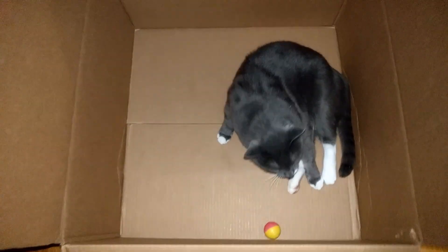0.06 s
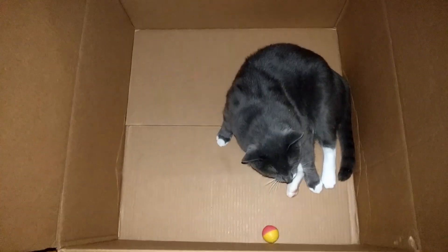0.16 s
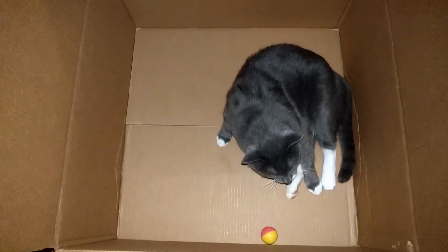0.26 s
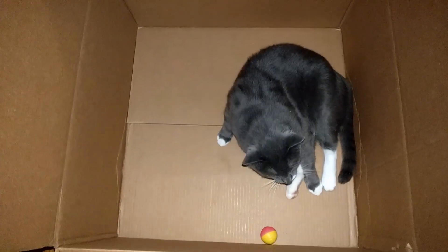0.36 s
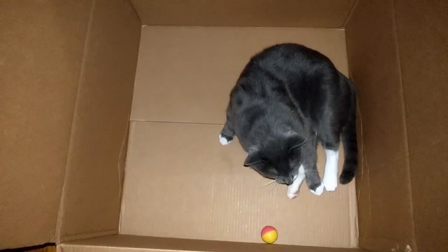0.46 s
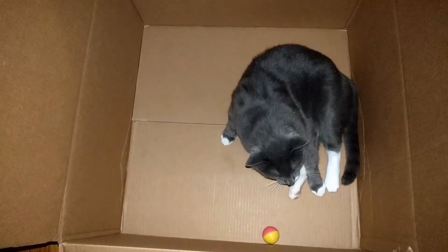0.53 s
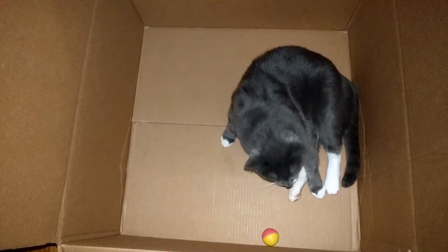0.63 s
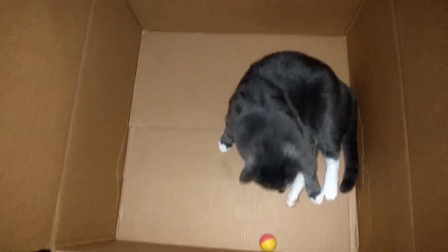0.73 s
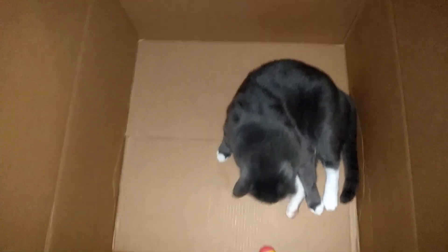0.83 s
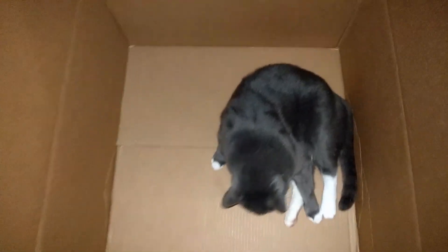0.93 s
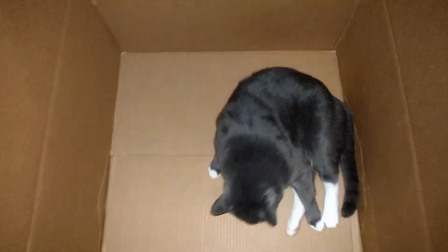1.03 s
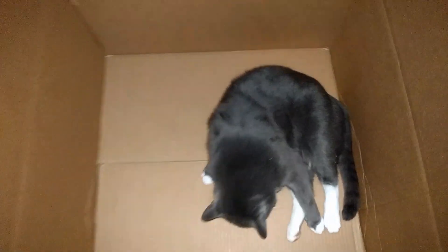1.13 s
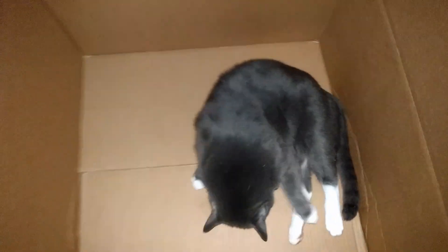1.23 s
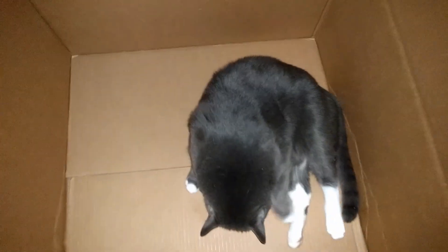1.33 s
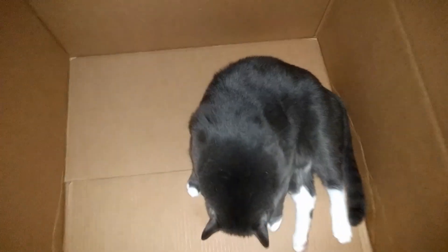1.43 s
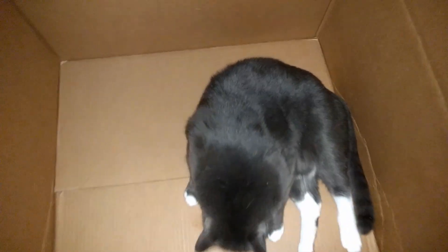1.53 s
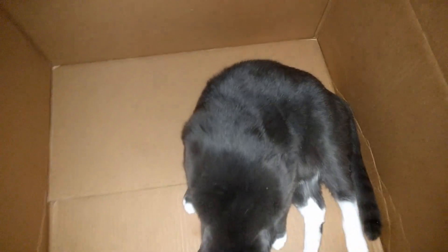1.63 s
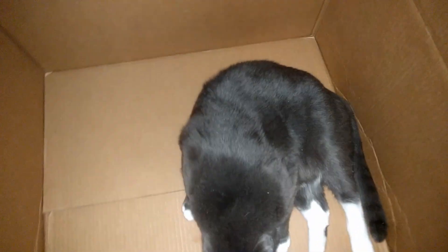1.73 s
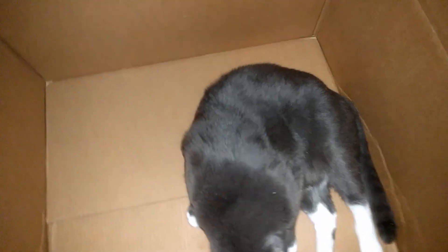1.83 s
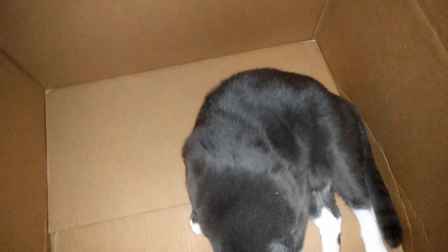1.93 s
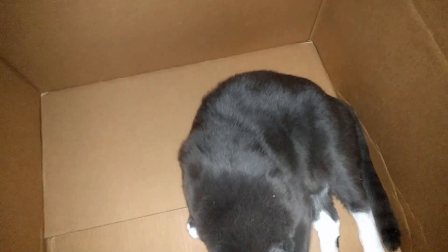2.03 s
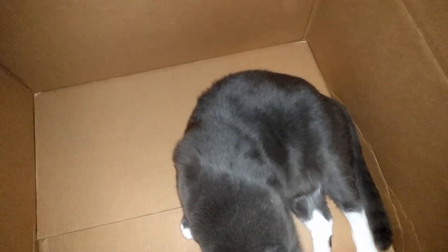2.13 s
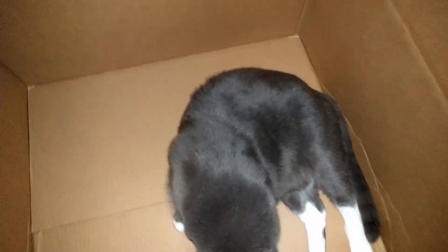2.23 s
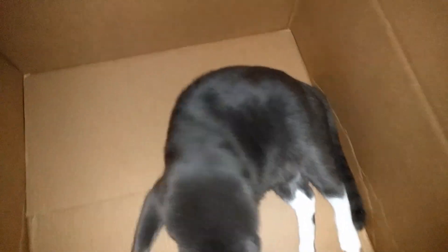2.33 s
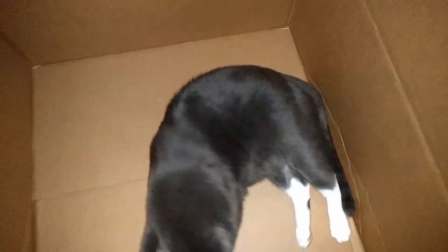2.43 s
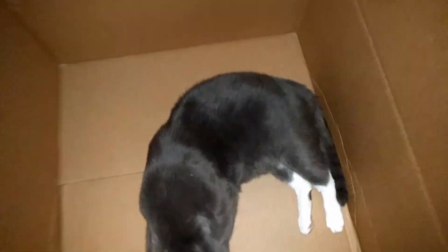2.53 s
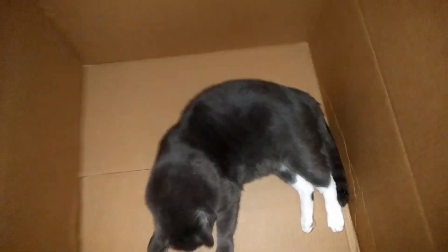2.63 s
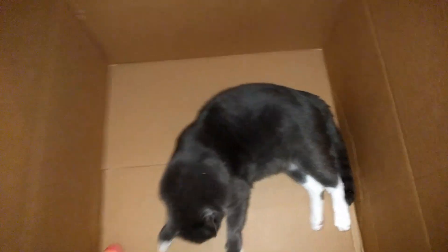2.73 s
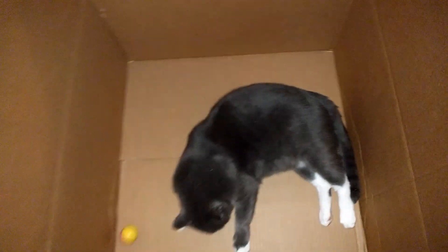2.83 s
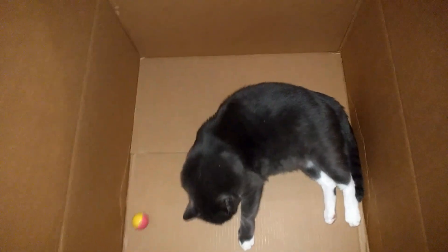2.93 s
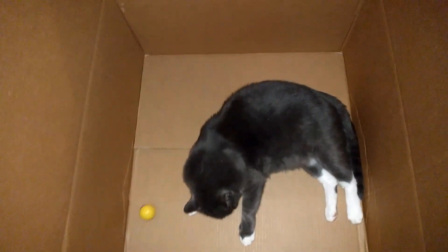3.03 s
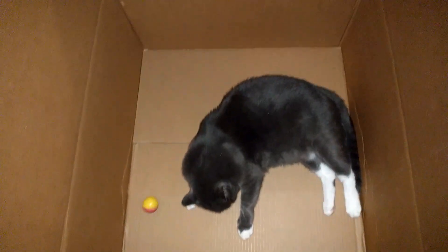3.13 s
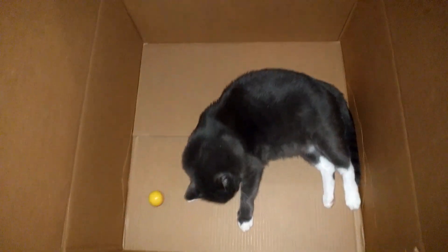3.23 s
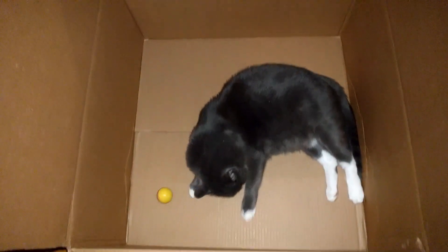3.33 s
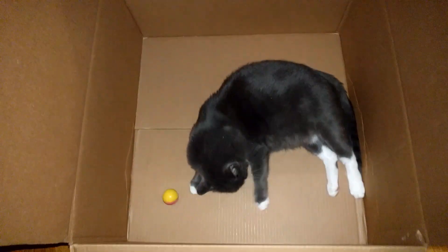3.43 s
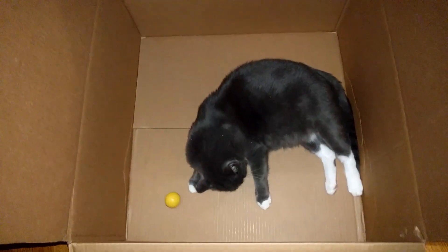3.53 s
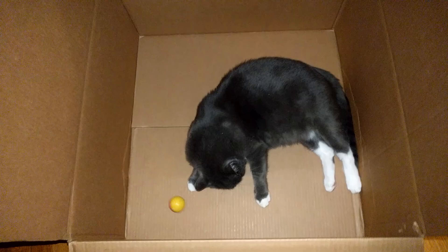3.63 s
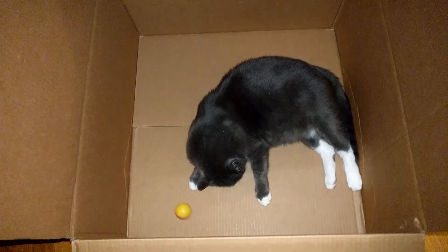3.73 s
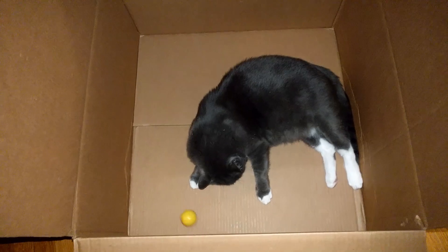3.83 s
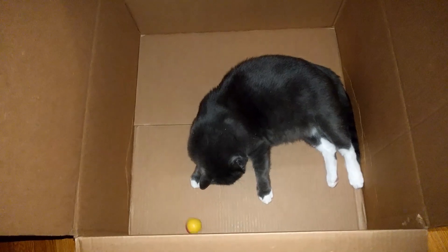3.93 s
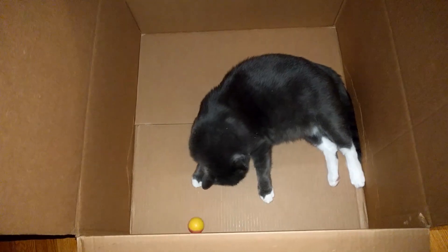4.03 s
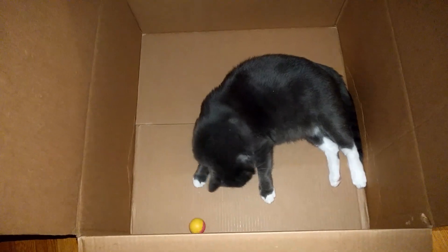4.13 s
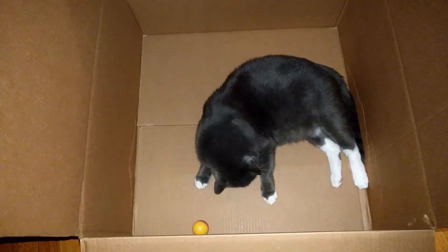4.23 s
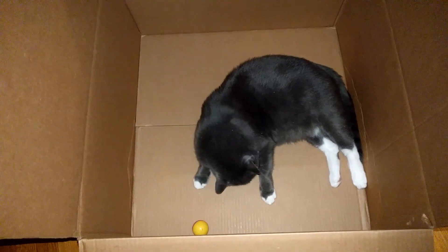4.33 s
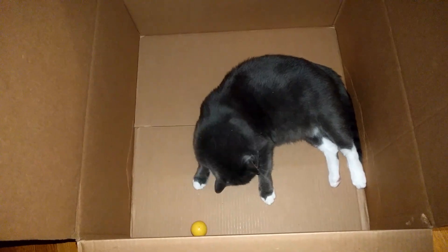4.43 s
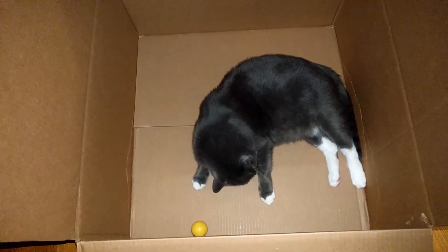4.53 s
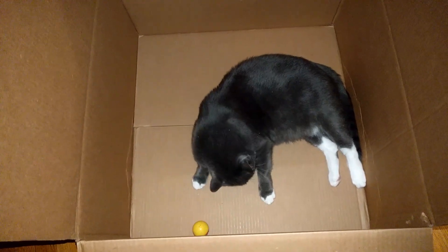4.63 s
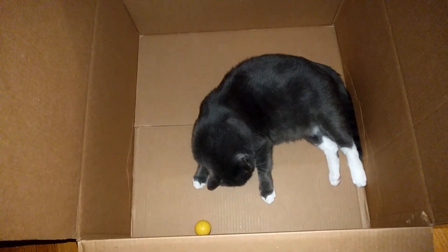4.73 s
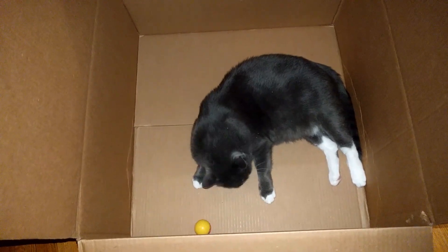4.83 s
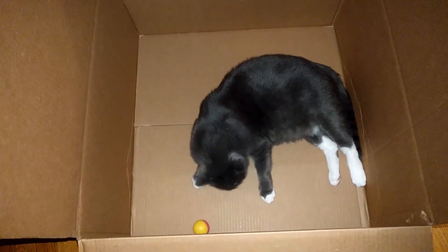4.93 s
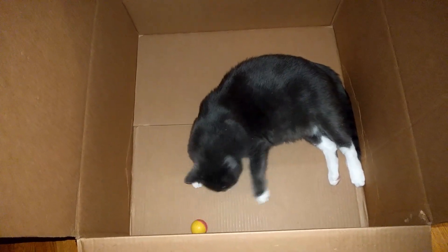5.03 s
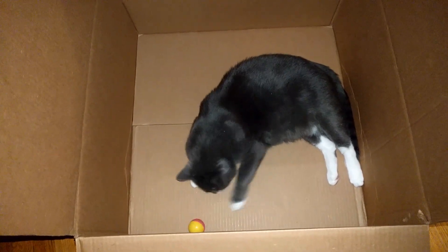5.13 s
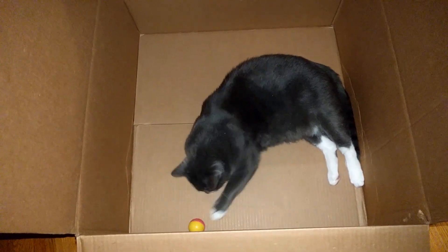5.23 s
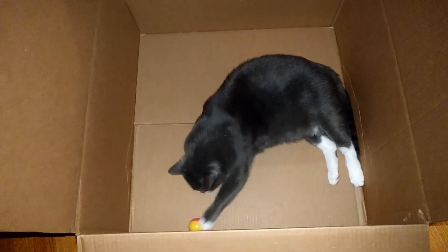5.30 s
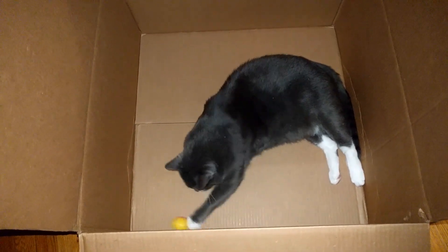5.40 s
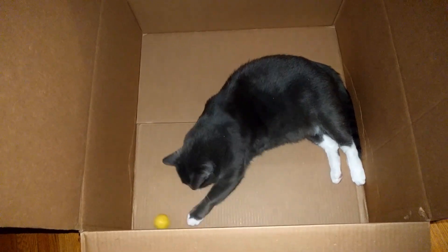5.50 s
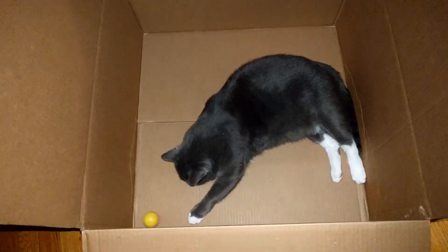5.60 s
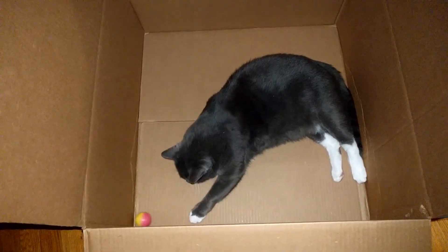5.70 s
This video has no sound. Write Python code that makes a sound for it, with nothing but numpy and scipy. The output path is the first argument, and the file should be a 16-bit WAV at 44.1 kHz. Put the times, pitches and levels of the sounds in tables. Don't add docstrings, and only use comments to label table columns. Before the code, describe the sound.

A cat moves in an open cardboard box in a quiet room, heard close from above on a handheld phone, with slightly bright, sharp treble and faint hum. From 0 to 1 s there are sparse claw ticks, dull board scrapes and low floor rumble, with a sharper catch at about 1.0 s. Soft fur hiss continues until 2.0 s, when the cat turns: strong rasping rustle, a creaking wall from 2.3 s, rapid juddering claws, then the loudest paw slap at 2.6 s and another near 2.7 s, hollow and booming. It settles by 3 s into light rustles, ticks and dull taps from 3.4 to 4.0 s. A light ball knocks the hollow wall clearly at 4.1 s, flaps shivering, with weaker taps at 4.5, 4.7 and 5.1 s. A short crisp scratch and rustle at 5.5-5.7 s fades to near quiet.

```python
import sys
import numpy as np
from scipy import signal
from scipy.fft import rfft, irfft, next_fast_len
from scipy.io import wavfile
from scipy.ndimage import uniform_filter1d

SR = 44100
rng = np.random.default_rng(int(sys.argv[2]) if len(sys.argv) > 2 else 0)


def volts(x):
    e = np.asarray(x, float) / 20
    return 10 ** e


def int16_out(signal):
    q = np.round(np.clip(np.atleast_2d(signal).T, -1, 1) * 32767)
    wavfile.write(sys.argv[1], SR, q.astype(np.int16))


N = 254016

# mode_hz [Hz], level_db [dB], t60_s [s]
LOADED_LOW_MODES = [(192.2, 0, 0.33), (240, -10, 0.2), (201.5, 1.5, 0.13), (306, -2.5, 0.054),
                    (365, -20, 0.15), (443, 3.5, 0.092), (471, -1.5, 0.092), (590, -11.5, 0.13)]


def shape(x, points):
    size = next_fast_len(len(x))
    hz, db = np.transpose(points)
    log_hz = np.log(np.arange(size // 2 + 1) * SR / size + 1)
    gain = volts(np.interp(log_hz, np.log(hz), db, left=-80, right=-80))
    return irfft(rfft(x, size) * gain, size)[:len(x)]


def unit(x):
    return x / np.sqrt(np.mean(x ** 2))


def walk(rate):
    k = int(SR / rate)
    held = np.repeat(rng.standard_normal(N // k + 1), k)
    return 1.2 * uniform_filter1d(held, k)[:N]


def grit(points, spread_db, patchy_db, rate):
    slips = rng.standard_normal(N) * volts(spread_db * rng.exponential(size=N))
    return unit(shape(slips, points) * volts(patchy_db * walk(rate)))


def spikes(s, db):
    x = np.zeros(N)
    np.add.at(x, np.minimum((s * SR).astype(int), N - 1), volts(db))
    return x


def fade(x, t60):
    return signal.lfilter([1], [1, -np.exp(-np.log(1000) / (t60 * SR))], x)


def ring(s, db, modes, scatter_db, contact_s):
    chance = rng.standard_normal((len(s), len(modes)))
    out = np.zeros(N)
    for k, (hz, mode_db, t60) in enumerate(modes):
        r = np.exp(-np.log(1000) / (t60 * SR))
        w = 2 * np.pi * hz / SR
        hits = spikes(s, db + mode_db + scatter_db * chance[:, k])
        out += (-1) ** k * signal.lfilter([0, r * np.sin(w)], [1, -2 * r * np.cos(w), r * r], hits)
    push = np.hanning(int(contact_s * SR) + 3)
    return np.convolve(out, push / push.sum())[:N]


def snap(s, db, points, t60, sharp_db):
    edge = spikes(s, db)
    rise_s = 0.0016
    swell = uniform_filter1d(fade(edge, t60), int(rise_s * SR) + 1)
    burst = rng.standard_normal(N) * swell - volts(sharp_db) * edge
    return shape(burst, points) / np.linalg.norm(shape(spikes(np.ones(1), 0), points))


def stroke(s, length):
    attack_s, attack_share, fall_db_s = 0.021, 0.15, 446.5
    t = np.arange(N) / SR - s
    rise = np.clip(t / (attack_s + attack_share * length), 0, 1)
    return rise ** 2 * volts(-fall_db_s * np.maximum(t - length, 0))


def bursts(rows):
    out = np.zeros(N)
    for s, length, db, hz, width_hz in rows:
        slips = rng.standard_normal(8192) * volts(1.3 * rng.exponential(size=8192))
        band = signal.iirpeak(hz, hz / width_hz / 1.5, fs=SR)
        burst = unit(signal.lfilter(*band, signal.lfilter(*band, slips)))
        u = np.arange(len(burst)) / (length * SR)
        envelope = np.minimum(6.0 * u, 1) * np.exp(-u ** 3)
        part = out[int(s * SR):][:len(u)]
        part += (volts(db) * burst * envelope)[:len(part)]
    return out


def drive(db, press_db):
    return volts(np.array([db, db + press_db, db - 24 - 0.62 * press_db]))


def movement():
    # time_s [s], effort_db [dB], pressure_db on the board [dB]
    shifting = [(0, -71, -2), (.2, -71.5, 2.5), (.37, -70.5, 5.5), (.45, -80.5, -7), (.54, -68, 7),
                (.66, -74.5, -6), (.78, -58, -3.5), (.95, -61.5, -8), (1.4, -52, -9), (2.0, -55.5, -9.5),
                (2.75, -48.5, -3), (3.4, -60, -3), (4.1, -66, 4), (4.501, -69, -12.5), (4.7, -76.5, -17),
                (4.801, -68.5, 1), (5.02, -75, -27), (5.452, -71, -12)]
    # start_s [s], length_s [s], effort_db [dB], pressure_db on the board [dB]
    sweeps = [(.28, 0.099, -72, 0), (0.654, 0.082, -66.5, 6.5), (1.057, 0.089, -58, -6),
              (2.007, .14, -37.5, -13), (2.191, 0.024, -43.5, -0.5), (2.235, 0.075, -41, -10),
              (2.297, 0.082, -32, -13), (2.363, 0.078, -40.5, -12), (2.456, 0.11, -37.5, -4),
              (2.573, 0.056, -38, 5), (2.627, 0.11, -44, 3), (2.738, 0.063, -60, 8), (2.5, .09, -51, -30),
              (2.857, 0.12, -55.5, -16), (2.829, 0.17, -46, -9), (3.036, .14, -51, -8.5),
              (3.444, .12, -52, -8), (3.623, 0.042, -52, -16), (3.74, 0.057, -73.5, 16),
              (4.173, 0.085, -68.5, -32), (4.25, 0.096, -64, -16), (5.133, 0.056, -59.5, -13),
              (5.458, 0.051, -43, 0.5), (5.493, 0.083, -44, -7.5), (5.575, 0.1, -46, -3),
              (5.677, 0.072, -63, 5.5)]
    # start_s [s], effort_db [dB], pressure_db on the board [dB]
    jolts = [(0.065, -57.5, 3.5), (.247, -55.5, 0), (.52, -81, 8), (.578, -67, 4), (0.817, -50.5, 4.5),
             (0.995, -44.5, 2), (4.119, -48, 6.5), (4.405, -75.5, -5), (4.525, -61.5, 2.5), (4.74, -66, 9),
             (5.091, -60, -9), (5.355, -76, -1.5)]
    settle_t60_s = 0.31
    s, *columns = np.transpose(shifting)
    power = drive(*(np.interp(np.arange(N) / SR, s, c) for c in columns)) ** 2
    for s, length, db, press_db in sweeps:
        power += (drive(db, press_db)[:, None] * stroke(s, length)) ** 2
    s, db, press_db = np.transpose(jolts)
    for row, gain in zip(power, drive(db, press_db)):
        row += fade(spikes(s, 20 * np.log10(gain)), settle_t60_s) ** 2
    return np.sqrt(power)


def suppressor(fur_gain):
    quiet_db = -69
    rustle_db = 20 * np.log10(uniform_filter1d(fur_gain, size=1024))
    return volts(np.minimum(1.41 * (rustle_db - quiet_db), 0))


def room_hum(kept):
    # freq_hz [Hz], level_db [dB]
    room_colour = [(30, -19.5), (45, -5), (100, -3), (303, -13.5), (3060, -27), (6550, -37.5), (8520, -34),
                   (16000, -28)]
    return grit(room_colour, .1, 1.9, 13) * volts(-64.5) * kept


def panel_rumble(kept):
    # freq_hz [Hz], density_db [dB per Hz]
    rumble_colour = [(25, -30), (38, -2.5), (52, 6.5), (105, -2), (160, -11.5), (300, -21.5), (500, -37.5)]
    # start_s [s], length_s [s], level_db [dB]
    heaves = [
        (0.308, 0.069, -52),
        (0.79, 0.032, -42),
        (1.977, 0.23, -34.5),
        (2.386, 0.13, -62),
        (2.594, 0.29, -38.5),
        (2.842, 0.26, -53),
        (4.047, 0.24, -63),
        (5.476, 0.16, -47),
    ]
    rest_db = -55.5
    weight = volts(rest_db) * kept + sum(volts(db) * stroke(s, length) for s, length, db in heaves)
    return grit(rumble_colour, .1, 0.97, 11) * volts(-11.0) * weight


def rubbing(fur_gain, scrape_gain, hair_gain, kept):
    # freq_hz [Hz], density_db [dB per Hz]
    fur_colour = [(3500, -24), (5000, -1), (6500, 2), (8000, -3.5), (10000, -18), (13000, -39)]
    pad_colour = [(1200, -9), (2200, -6), (3200, -3), (4300, -3), (6000, -11)]
    scrape_colour = [(120, -24.5), (200, 7), (450, 0), (800, -1.5), (1500, -0.5), (2200, -2.5), (3200, -20),
                     (5000, -25.5)]
    hair_colour = [(7000, -19.5), (9500, -3.5), (13000, -5.5), (16000, -3.5)]
    hair_rest_db = -78.5
    fur = grit(fur_colour, 1.9, 0.79, 45) * volts(-8.5) * fur_gain
    pads = grit(pad_colour, 2.3, 2.6, 60) * volts(-11.0) * fur_gain
    scrape = grit(scrape_colour, 2.72, 2.5, 70) * volts(-4.0) * scrape_gain
    hair = grit(hair_colour, 0.9, 1.9, 22) * np.hypot(hair_gain, volts(hair_rest_db) * kept)
    return fur + pads + scrape + hair


def shuffle():
    fur_gain, scrape_gain, hair_gain = movement()
    kept = suppressor(fur_gain)
    return rubbing(fur_gain, scrape_gain, hair_gain, kept) + panel_rumble(kept) + room_hum(kept)


def creak():
    # start_s [s], level_db [dB], pitch_hz [Hz]
    wall_slips = [(2.32, -30.5, 247), (2.334, -29.5, 240), (2.352, -24.5, 249), (2.373, -25, 243),
                  (2.394, -26.5, 272), (2.408, -29, 310), (2.425, -32, 391), (2.44, -32, 480),
                  (2.458, -28, 426), (2.471, -36.5, 356), (2.49, -27, 170), (2.507, -29.5, 191),
                  (2.52, -36.5, 404), (2.533, -29, 332), (2.552, -30.5, 222), (2.569, -29.5, 398)]
    rise_s, length_s = 0.0018, .0075
    out = np.zeros(N)
    t = np.arange(2048) / SR
    swell = (1 - np.exp(-t / rise_s)) * np.exp(-(t / length_s) ** 2)
    for s, db, hz in wall_slips:
        tone = np.sin(2 * np.pi * hz * t) + 0.36 * np.sin(2 * np.pi * 2.4 * hz * t)
        out[int(s * SR):][:len(t)] += volts(db + 0.6) * swell * tone
    return out


def flaps():
    # start_s [s], level_db [dB], pitch_hz [Hz], t60_s [s]
    flap_rings = [(2.71, -31, 134, 0.38), (2.625, -20.5, 430, 0.31), (2.68, -24.5, 301.7, 0.22),
                  (2.66, -32, 414, 0.16), (2.735, -37.5, 550, .23), (2.77, -34.5, 210, 0.31),
                  (2.735, -27.5, 196, .25), (4.12, -44, 1180, .2), (4.12, -47, 1550, .22),
                  (4.12, -46, 670, .2), (4.117, -32.5, 197, 0.4), (4.118, -36.5, 490, 0.36),
                  (4.23, -43.5, 434, 0.21), (4.403, -56, 192, .4), (4.53, -51, 205, 0.33),
                  (4.735, -47.5, 220, 0.42), (5.089, -48, 198, 0.6), (5.356, -58.5, 202, .35),
                  (3.91, -55, 193, .3), (3.97, -55, 199.4, 0.37)]
    twin_ratio, twin_db = 1.055, -6.5
    out = np.zeros(N)
    for s, db, hz, t60 in flap_rings:
        pair = [(hz, 0, t60), (hz * twin_ratio, twin_db, t60)]
        out += ring(np.array([s]), db, pair, 0, .002)
    return out


def rasps():
    # start_s [s], length_s [s], level_db [dB], centre_hz [Hz], width_hz [Hz]
    rasp_rows = [(0.066, 0.0087, -50, 1920, 220), (1.004, 0.047, -50, 1440, 690),
                 (2.035, 0.128, -52, 15000, 3700), (5.528, 0.007, -50, 6900, 1200),
                 (5.54, 0.0086, -42, 6800, 1400), (5.553, 0.0045, -45, 7300, 2000),
                 (5.576, .006, -38, 7000, 770), (5.608, 0.0068, -45.5, 5500, 3100),
                 (5.638, 0.013, -47, 6900, 1200), (5.664, 0.0035, -54, 6500, 1800),
                 (2.649, 0.0034, -35, 6700, 700), (5.54, 0.016, -52, 2630, 370),
                 (5.53, 0.16, -64, 13000, 4000), (3.116, 0.115, -57.5, 6100, 1800),
                 (2.012, 0.09, -43, 4500, 3800), (2.041, 0.14, -48.5, 3600, 1800),
                 (2.205, 0.041, -40, 2970, 2400), (2.212, 0.017, -50, 5300, 700),
                 (2.315, 0.021, -38.5, 2400, 1100), (5.2, 0.019, -58, 790, 35),
                 (4.718, 0.015, -74, 4150, 100), (4.34, 0.038, -74, 2170, 120),
                 (4.756, 0.052, -70, 6240, 300), (5.8, 0.017, -70, 1400, 504),
                 (5.472, 0.026, -46, 1350, 820), (5.512, .014, -45, 7000, 1200),
                 (5.49, .012, -56, 4600, 500), (5.475, .028, -55, 3770, 270),
                 (5.526, 0.026, -51, 3480, 210), (2.222, 0.02, -45, 3440, 250),
                 (2.055, 0.034, -48, 3700, 380), (5.522, 0.028, -56, 2800, 1300),
                 (5.634, 0.022, -57.5, 1700, 1000)]
    return bursts(rasp_rows)


def more_rasps():
    # start_s [s], length_s [s], level_db [dB], centre_hz [Hz], width_hz [Hz]
    more_rasp_rows = [(2.022, 0.011, -51, 3500, 300), (2.08, .012, -43.5, 7040, 400),
                      (2.15, 0.022, -48, 3000, 500), (2.155, 0.013, -46, 7400, 500),
                      (2.205, 0.025, -47, 7690, 900), (2.225, 0.016, -48, 7300, 500),
                      (2.231, 0.0088, -40.5, 3320, 250), (2.233, .01, -45, 2540, 250),
                      (2.246, 0.022, -49, 7200, 600), (2.3, 0.045, -46.5, 249, 100),
                      (2.326, .012, -35.5, 300.5, 120), (2.1, .1, -49, 110, 40), (2.05, .02, -50, 4420, 300),
                      (2.12, .015, -49, 4300, 300), (2.392, 0.1, -51, 1400, 200),
                      (2.475, 0.034, -44, 1900, 200), (2.4, .1, -45, 420, 200), (2.49, 0.076, -43, 450, 250),
                      (2.49, 0.069, -47, 1500, 600), (3.908, .022, -59.5, 890, 300),
                      (3.964, 0.037, -58.5, 784, 300), (5.487, 0.0094, -48, 1100, 300),
                      (5.544, 0.0091, -48.5, 3400, 250), (5.598, .007, -49, 1300, 700),
                      (5.608, 0.01, -48.5, 1700, 900), (5.64, 0.016, -54, 2000, 400), (5.6, .05, -55, 303, 100),
                      (5.52, 0.025, -55, 330, 120), (5.675, .014, -56, 7000, 900)]
    return bursts(more_rasp_rows)


def judder():
    # start_s [s], level_db [dB]
    flutes = [(2.395, -29), (2.411, -38), (2.425, -32.5), (2.44, -30), (2.456, -27.5), (2.475, -23),
              (2.486, -30), (2.497, -34), (2.514, -36), (2.534, -40.5), (2.554, -28.5), (2.571, -40),
              (2.32, -39), (2.35, -39)]
    # mode_hz [Hz], level_db [dB], t60_s [s]
    flute_modes = [(980, -12, .014), (1400, 0, .016), (1920, -1, .016), (2400, -8, .01), (3600, -14, .006)]
    gap_s = .0021
    s, db = np.transpose(flutes)
    chance = rng.random((len(s), 6))
    slip_s = s[:, None] + gap_s * (np.arange(3) + .06 * chance[:, :3])
    slip_db = db[:, None] - 3.0 - 3 * chance[:, 3:]
    return ring(slip_s.ravel(), slip_db.ravel(), flute_modes, 1.1, .0001)


def claws():
    # start_s [s], crack_db [dB], tock_db of the board [dB], thump_db of the hollow [dB]
    catches = [(0.062, -48.5, -41, -57), (0.247, -43.5, -49.5, -62), (0.577, -52, -48, -55.5),
               (0.815, -42.5, -38.5, -46), (0.831, -46, -52, -73), (0.858, -48, -47, -72),
               (0.992, -30.5, -30, -81), (2.395, -29, -36, -74), (2.425, -44, -29, -33),
               (2.44, -36, -30, -49), (2.456, -26.5, -30, -34), (2.475, -30, -25, -35),
               (2.485, -21, -32, -35), (2.554, -32, -37, -64), (2.588, -28, -28, -52),
               (2.599, -13.5, -18, -20.5), (2.651, -36.5, -31, -37), (2.691, -29.5, -29, -35),
               (3.755, -53, -39, -47), (3.91, -50, -52, -48.5), (4.1144, -39, -23.5, -43),
               (4.524, -52, -54, -54), (5.088, -58, -46.5, -54), (5.531, -53, -59, -75),
               (5.545, -44, -61, -50), (5.552, -50, -62, -49), (5.577, -44, -45, -44.5),
               (5.599, -38, -37.5, -39), (5.61, -45, -42.5, -42.5), (5.728, -50, -43, -47)]
    # start_s [s], crack_db [dB]
    tick_rows = [(.149, -57), (.219, -61), (0.346, -54.5), (0.528, -62), (0.924, -58), (0.981, -47),
                 (1.129, -60), (1.267, -53), (2.669, -40), (2.878, -45), (2.972, -58), (3.469, -49),
                 (3.547, -50), (3.644, -47.5), (3.849, -59), (3.884, -56), (4.028, -48.5), (4.487, -60),
                 (4.578, -61), (4.788, -51.5), (5.185, -50.5), (5.22, -59), (5.394, -62)]
    # start_s [s], tock_db [dB]
    tap_rows = [(0.301, -68), (.727, -58), (0.788, -55), (0.956, -51), (2.513, -42), (3.417, -47.5),
                (3.451, -50), (3.483, -46.5), (3.587, -49.5), (3.706, -56), (3.797, -60), (3.922, -50),
                (3.966, -47.5), (3.985, -53.5), (4.021, -60), (4.043, -49), (4.406, -53.5), (4.539, -63.5),
                (4.74, -78), (5.053, -64), (5.355, -57.5), (5.421, -66)]
    # freq_hz [Hz], density_db [dB per Hz]
    crack_colour = [(600, -22), (2000, -14), (4000, -3.5), (7000, -2.5), (9000, -19), (12000, -32.5)]
    splinter_colour = [(400, -14.5), (900, -1), (1600, -4), (2400, -16), (3800, -19)]
    # mode_hz [Hz], level_db [dB], t60_s [s]
    tock_modes = [(954, -16.5, 0.0062), (1356, -12.5, 0.0053), (1600, -3.5, 0.012), (1900, -4, 0.023),
                  (2450, -15, 0.0067)]
    ticks = [(s, db, db - 5, db - 5) for s, db in tick_rows]
    taps = [(s, db - 6.5, db, db - 2.5) for s, db in tap_rows]
    s, crack_db, tock_db, thump_db = np.transpose(catches + ticks + taps)
    s = s + 0.00042
    crack = snap(s, crack_db - 2.0, crack_colour, 0.018, 8.0)
    tock = ring(s, tock_db - 3.0, tock_modes, 2.5, .00015)
    splinters = snap(s, tock_db - 7.0, splinter_colour, 0.032, 1.2)
    damped = [(hz, db, 0.22 * t60) for hz, db, t60 in LOADED_LOW_MODES[1:6]]
    thump = ring(s, thump_db, damped, 2.9, 0.0014)
    return crack + tock + splinters + thump


def knocks():
    # start_s [s], ring_db of the hollow [dB], edge_db of rap, small walls and flaps
    # [dB]
    ball_hits = [
        (4.117, -22.5, -28.5),
        (4.403, -59, -59),
        (4.536, -52.5, -59.5),
        (4.735, -42.5, -52.5),
        (5.089, -44, -49.5),
        (5.356, -61, -60),
    ]
    # mode_hz [Hz], level_db [dB], t60_s [s]
    low_modes = [(195.5, -2.5, 0.35), (361.2, -4, 0.32), (211, -14, 0.3), (499, 0.5, 0.092),
                 (425, 4.5, 0.28), (447, -4, 0.24), (786, -9, .18), (840, -9, 0.18)]
    high_modes = [(778, 14.5, 0.08), (846, 8, 0.16), (1190, 12.5, 0.06), (1300, -16, 0.34),
                  (1384, -17, 0.099), (1540, -27, 0.27), (1680, -18, 0.286), (1965, -22, 0.77),
                  (2230, -38, 0.61), (2790, -17, 0.25), (2623, -21, 0.14), (2704, -13, 0.16)]
    flap_colour = [(130, -23.0), (200, 14.0), (450, -15.0), (800, 0), (1200, -10), (2000, -17.0),
                   (3000, -27.5)]
    s, ring_db, edge_db = np.transpose(ball_hits)
    hollow = ring(s - .001, ring_db - 8.5, low_modes, 1.2, .0012)
    shiver = snap(s, edge_db - 8.5, flap_colour, 0.31, 9.0)
    rap = np.convolve(spikes(s + 0.00096, edge_db), np.hanning(30))[:N]
    walls = ring(s, edge_db - 17.0, high_modes, 1.56, 0.00012)
    return hollow + shiver + rap + walls


def blows():
    # start_s [s], ring_db of the hollow [dB], edge_db of slap, rebound and walls [dB],
    # panel_db [dB]
    paw_hits = [
        (2.014, -56.5, -42, -40),
        (2.597, -10, -10.5, -31),
        (2.629, -34.5, -43, -36),
        (2.688, -13, -15, -32),
        (2.722, -28, -34.5, -45),
    ]
    # mode_hz [Hz], level_db [dB], t60_s [s]
    wall_modes = [(703, -5, 0.1), (758, 8.5, 0.055), (1084, -7.5, 0.16), (1450, -2.5, .12),
                  (1484, -12.5, 0.076), (1870, 4, 0.042), (2070, -2, 0.052), (2480, -11, 0.046)]
    panel_modes = [(119.5, 9.5, 0.27), (48, -4.5, 0.24), (80, -12.5, .4), (143, -7.5, .3)]
    boom_colour = [(150, -18.5), (210, 6.5), (300, -12.5), (500, -9.0), (680, -20),
                   (1200, -30.5)]
    s, ring_db, edge_db, panel_db = np.transpose(paw_hits)
    slap = -np.convolve(spikes(s + 0.0036, edge_db + 6.0), np.hanning(18))[:N]
    slap += np.convolve(spikes(s + .0042, edge_db - 5.5), np.hanning(120))[:N]
    hollow = ring(s + .003, ring_db - 12.0, LOADED_LOW_MODES, 2.4, 0.0017)
    walls = ring(s + 0.0033, edge_db - 19.5, wall_modes, 1.0, 0.00031)
    boom = snap(s + .004, ring_db - 16.0, boom_colour, 0.34, 1.1)
    panel = ring(s, panel_db - 11.5, panel_modes, 2.3, 0.0018)
    return slap + hollow + walls + boom + panel


def scene():
    # freq_hz [Hz], level_db [dB]
    port_gap = [(30, -33.5), (300, -36.5), (700, -23), (2000, -18.5), (7000, -21), (10000, -7),
                (16000, -2.5)]
    # freq_hz [Hz], level_db [dB]
    right_lead = [(30, -47), (300, -39), (1000, -24.5), (7000, -29.5), (10000, -18.5), (17000, -12.5)]
    mid = shuffle() + creak() + flaps() + rasps() + more_rasps() + judder() + claws() + knocks() + blows()
    scatter = rng.standard_normal(1024) * np.exp(-np.arange(1024) / 250.)
    side = shape(signal.fftconvolve(mid, scatter / np.linalg.norm(scatter))[:N], port_gap)
    side -= shape(mid, right_lead)
    return np.array([mid + side, mid - side])


def masked(x):
    from_hz, edge_db_khz = 11000, 6
    under_db, per_db, most_db, scatter_db = -55.5, .8, -87, 3.5
    hz, _, z = signal.stft(x, SR, "cosine", nperseg=2048)
    power = np.abs(z.mean(axis=0)) ** 2 + 1e-20
    chance = rng.standard_normal((len(hz) // 16 + 1, z.shape[2]))
    patches = np.repeat(chance, 16, axis=0)[:len(hz)]
    edge_db = edge_db_khz * np.minimum(hz - from_hz, 0)[:, None] / 1000
    whole_db = 10 * np.log10(power.sum(axis=0))
    limit_db = np.minimum(under_db + per_db * whole_db, most_db) + scatter_db * patches + edge_db
    heard = uniform_filter1d(power, size=3, axis=0) > volts(limit_db) ** 2
    return signal.istft(z * heard, SR, "cosine", nperseg=2048)[1][:, :N]


def low_pass(x):
    return signal.sosfilt(signal.butter(12, 15810, fs=SR, output="sos"), x)


def record(dry):
    port_hz, port_width_hz, port_db = 6534, 1140, 8.5
    top_hz, stereo_from_db = 15750, -40
    x = signal.sosfilt(signal.butter(6, 42., "high", fs=SR, output="sos"), dry)
    b, a = signal.iirpeak(port_hz, port_hz / port_width_hz, fs=SR)
    x = x + (volts(port_db) - 1) * signal.lfilter(b, a, x)
    x = signal.sosfilt(signal.ellip(10, .2, 70, top_hz, fs=SR, output="sos"), x)
    mid, side = (x[0] + x[1]) / 2, (x[0] - x[1]) / 2
    loud = uniform_filter1d(mid ** 2, size=1024) > volts(stereo_from_db) ** 2
    side = side * uniform_filter1d(1. * loud, size=512)
    mix = masked(np.array([mid + side, mid - side]))
    return low_pass(mix)


dry = scene()
out = record(dry)
int16_out(out)
```